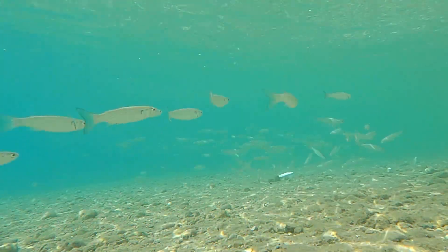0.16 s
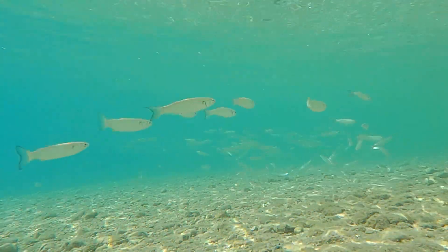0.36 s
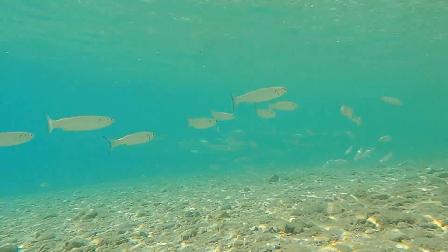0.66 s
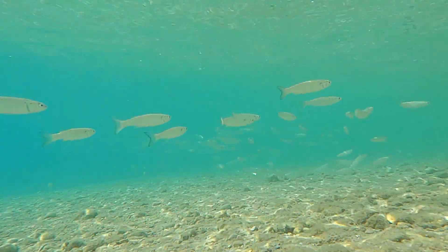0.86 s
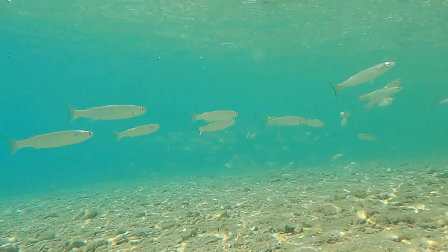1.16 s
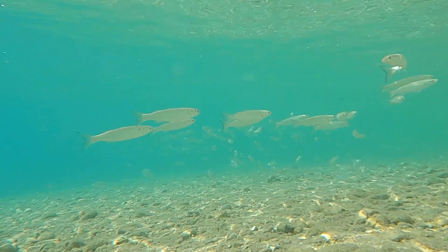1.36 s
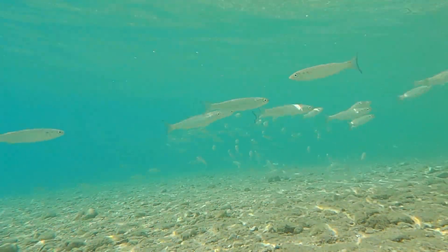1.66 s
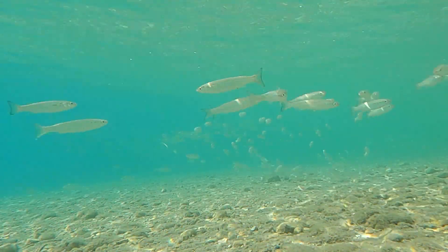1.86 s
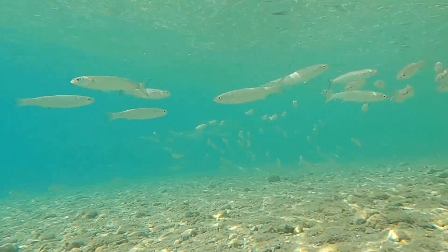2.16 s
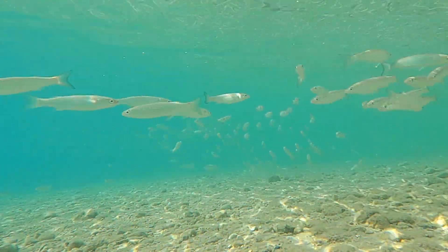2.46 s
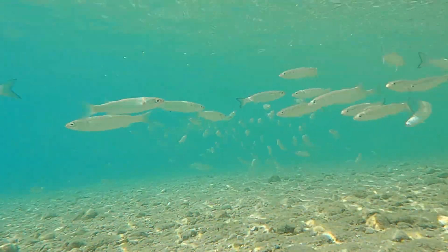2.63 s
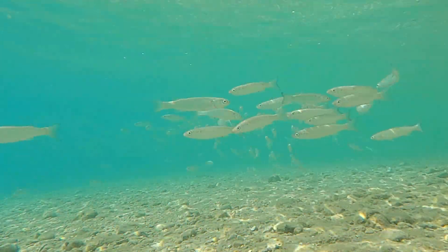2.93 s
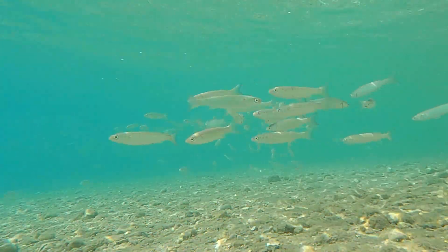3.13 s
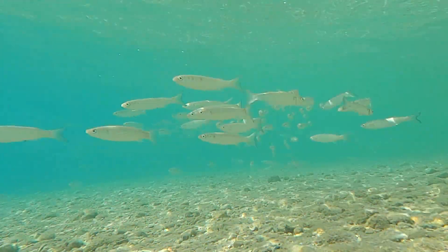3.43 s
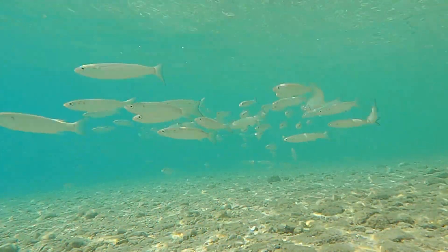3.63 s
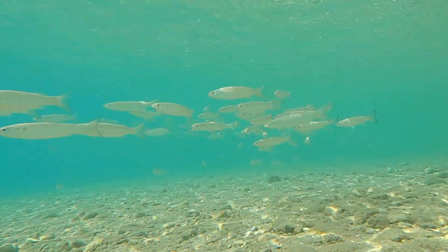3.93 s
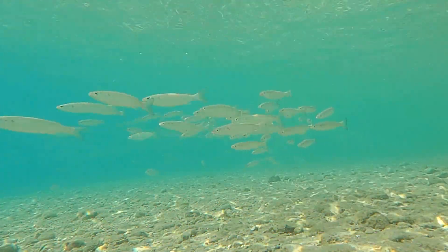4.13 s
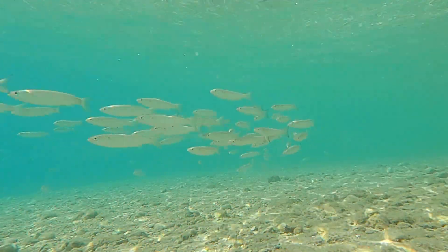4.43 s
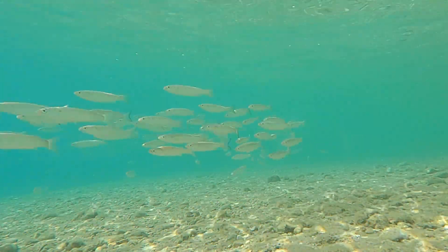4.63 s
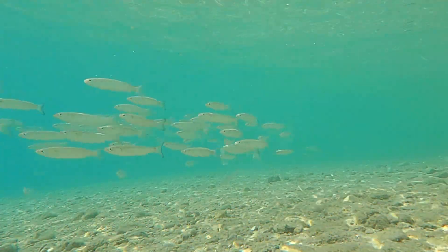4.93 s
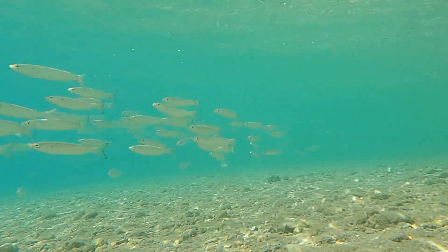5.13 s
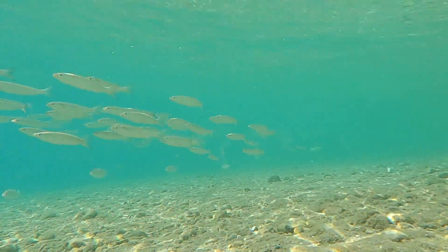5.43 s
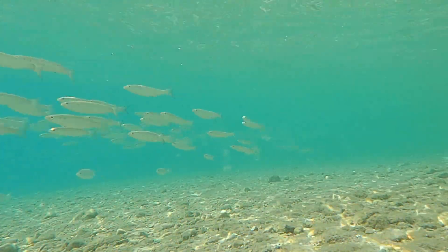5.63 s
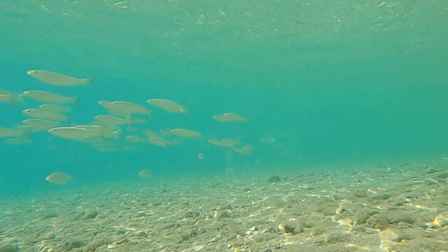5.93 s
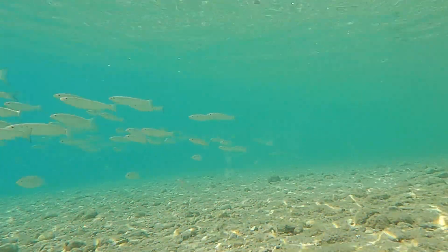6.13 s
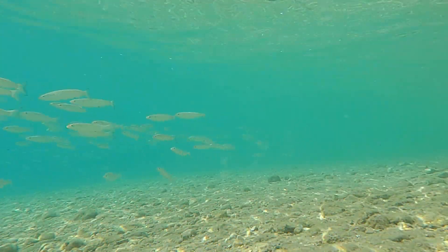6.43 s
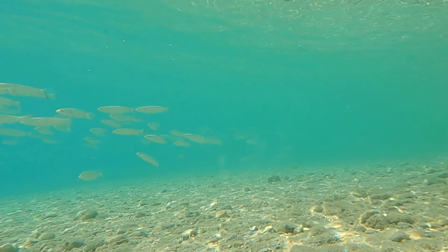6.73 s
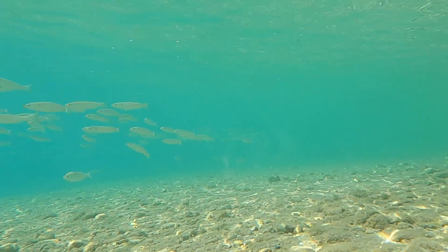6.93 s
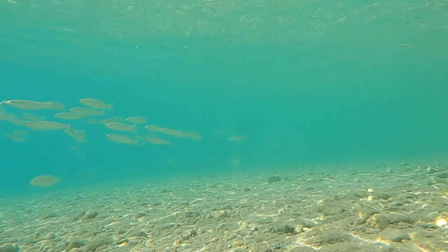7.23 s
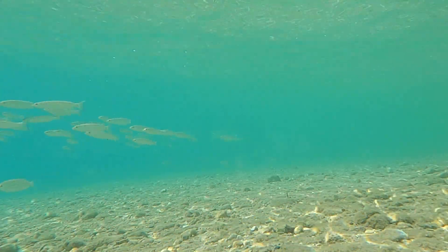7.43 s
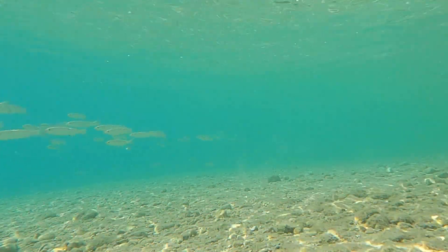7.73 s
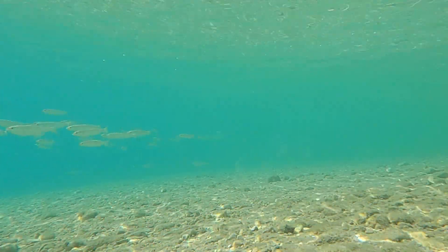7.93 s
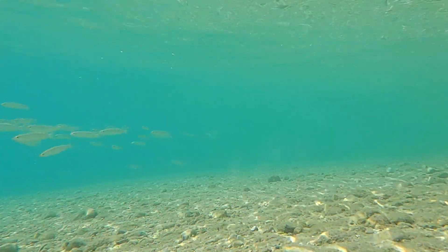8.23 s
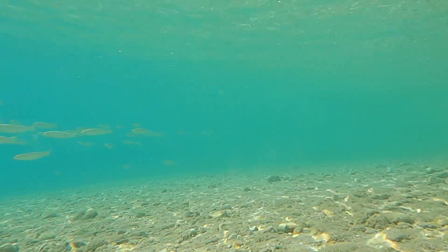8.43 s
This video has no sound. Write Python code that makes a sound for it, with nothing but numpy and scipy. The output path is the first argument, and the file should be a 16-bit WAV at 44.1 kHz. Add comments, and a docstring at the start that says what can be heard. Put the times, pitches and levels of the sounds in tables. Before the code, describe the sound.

A continuous underwater crackle: countless far shrimp blur into thin hiss, weaker snaps patter over it, and close ones pop as tiny bright spikes with very short pebble echoes. Water gently sways the microphones' sealed case, giving deep rumbles, rubbing washes and dull, quickly damped bumps, busiest around the middle and again near the end. Faint rushing swells come and go. The sound is close, boxy and slightly stereo.

```python
"""Under water over a shallow pebble bed: a camera rests in a sealed housing with two microphones inside.
Snapping shrimp click all around: near ones as sharp spikes with pebble echoes, further ones as random crackle,
the far colony as grainy noise, all coloured by the housing. Water noise sways the case and washes against it
in surges, soft knocks boom and rub on it, and a distant rush and a high whisper swell, some swells brief."""
import sys
import numpy as np
from scipy.fft import rfft, irfft, next_fast_len
from scipy.io import wavfile
from scipy.ndimage import map_coordinates

SR = 44100
rng = np.random.default_rng(int(sys.argv[2]) if len(sys.argv) > 2 else 0)


def file_out(sig):
    """Save sig as 16-bit WAV at sys.argv[1]."""
    # one column per channel
    cols = np.atleast_2d(sig).T
    # limit, then scale
    lim = np.clip(cols, -1, 1)
    pcm = np.round(lim * 32767).astype(np.int16)
    wavfile.write(sys.argv[1], SR, pcm)


N = 378378


def amp(db):
    """Decibels to amplitude gain."""
    return 10 ** (np.asarray(db) / 20)


def unit(x):
    """Scale x to rms 1."""
    return x / np.sqrt(np.mean(x ** 2) + 1e-30)


def along(points, hz):
    """Read each column of (frequency [Hz], ...) points on a log frequency axis."""
    point_hz, *columns = np.transpose(points)
    return np.squeeze([np.interp(np.log(hz + 1), np.log(point_hz), column) for column in columns])


def curves(rows):
    """Read each column of (time [s], ...) rows at every sample."""
    times, *columns = np.transpose(rows)
    return np.squeeze([np.interp(np.arange(N) / SR, times, column) for column in columns])


def wobble(rate):
    """A smooth random curve with rate knots a second."""
    knots = rng.standard_normal(int(N * rate / SR) + 4)
    return map_coordinates(knots, [np.arange(N) * rate / SR])


def coloured(x, level_db):
    """Pass x through the causal minimum-phase filter whose gain is level_db(Hz)."""
    n = x.shape[-1]
    m = 2 * next_fast_len(n // 2 + 2048)
    gain = amp(level_db(np.fft.rfftfreq(m, 1 / SR)))
    cepstrum = irfft(np.log(gain + 1e-6), m)
    # folding the cepstrum forward in time makes the filter causal
    cepstrum[1:m // 2] *= 2
    cepstrum[m // 2 + 1:] = 0
    return irfft(rfft(x, m) * np.exp(rfft(cepstrum)), m)[..., :n]


def noise(spectrum):
    """Two unrelated noises, rms 1 together, with the given relative spectrum."""
    white = rng.standard_normal((2, N))
    return unit(coloured(white, lambda hz: along(spectrum, hz)))


def add(track, s, sound):
    """Mix a sound into the track at s seconds."""
    start = max(round(s * SR), 0)
    part = track[:, start:start + sound.shape[1]]
    part += sound[:, :part.shape[1]]


def lift(rings, hz):
    """Gain in dB of a set of resonant peaks and notches."""
    return sum(db / (1 + (2 * (hz - centre) / width) ** 2) for centre, width, db in rings)


def swelling(events, calm_db, rise_share, edge_db, roundness):
    """Swells (crest s, length s, dB) add in power to a calm level; each is edge_db down at its ends."""
    t = np.arange(0, N / SR + .002, .002)
    rise_share = np.clip(rise_share, .1, .9)
    power = amp(calm_db) ** 2
    for s, length, db in events:
        before, after = (s - t) / rise_share, (t - s) / (1 - rise_share)
        away = np.maximum(before, after) / length
        power = power + amp(db - edge_db * np.abs(away) ** roundness) ** 2
    return curves(np.transpose([t, np.sqrt(power)]))


# what the housing lets through: (frequency [Hz], relative gain [dB])
HOUSING_COLOUR = [(300, -27.5), (520, -18.5), (690, -8), (900, -19.5), (1140, -19.5), (1420, -2),
                  (1820, 3.5), (2100, -11), (3300, -8), (4400, -2.5), (5600, -10.5), (7350, -11.5),
                  (8100, -24), (10500, -31), (12200, -37.5), (13800, -61)]
# narrow peaks and notches of the housing: (frequency [Hz], width [Hz], lift [dB])
HOUSING_RINGS = [(2255, 90, 6), (2613, 65, 7.5), (4020, 180, 8.5), (5850, 250, -3), (6210, 220, 4),
                 (6550, 200, -4), (6870, 200, 3)]


def housing(hz):
    """Gain in dB of the case: its broad colour plus its narrow rings."""
    return along(HOUSING_COLOUR, hz) + lift(HOUSING_RINGS, hz)


# the far colony's hiss ahead of the microphones: (time [s], level [dB])
COLONY_LEVEL = [(0, -56), (1.3, -57.5), (2.1, -58), (3.1, -57.5), (3.9, -56.5), (4.5, -58), (6.3, -57),
                (7.5, -59), (8.58, -56)]


def far_colony(grain_db=-1.0, low_db=-4):
    """Countless distant snaps merge into a grainy hiss: noise whose level flutters quickly."""
    grains = rng.standard_normal((2, N)) * amp(grain_db * wobble(600))
    lean = [(900, 1), (1500, low_db), (1900, low_db), (2400, 0.13)]
    hiss = unit(coloured(grains, lambda hz: housing(hz) + along(lean, hz)))
    return amp(curves(COLONY_LEVEL)) * hiss


# swells of distant hiss, some brief: (crest time [s], length [s], whisper level [dB], rush level [dB])
HISS_SWELLS = [(1.103, .6, -100, -63.5), (1.87, 0.27, -70, -60), (3.7, 1.8, -84, -72),
               (5.85, 1.3, -82, -66), (6.365, 0.18, -74, -66), (8.134, 0.22, -73, -62)]
# spectrum of the whisper: (frequency [Hz], relative level [dB])
WHISPER_SPECTRUM = [(7000, -63), (10000, -20), (11300, 1), (12000, 14), (12700, -10), (13600, -15)]


def whisper(calm_db=-104):
    """A faint narrow hiss near 12 kHz rises with most of the swells, some of them brief."""
    swells = [(s, length, db) for s, length, db, _ in HISS_SWELLS]
    level = swelling(swells, calm_db, rise_share=0.42, edge_db=7, roundness=0.94)
    return level * noise(WHISPER_SPECTRUM)


def rush(calm_db=-71, flutter_db=2.5, lag_s=0.17):
    """Distant water noise fills the housing's broad low resonance, lag_s behind the crest of each swell."""
    band = [(700, -34), (1100, -9), (1400, -2), (1610, 8),
            (1850, -2.0), (2100, -6.5), (2700, -9.5), (4000, -26.5)]
    swells = [(s + lag_s, length, db) for s, length, _, db in HISS_SWELLS]
    level = swelling(swells, calm_db, rise_share=0.57, edge_db=2.5, roundness=3.1)
    return level * amp(flutter_db * wobble(8.1)) * noise(band)


def arrivals(direct=5, hold=0.002, t60=0.028, drop_db=-6, tail_db=-31, tail_t60=0.3, echo_db=-23):
    """One snap's paths: the direct spike, a tight cluster off the pebbles, a quick decay, a weak late echo."""
    t = np.arange(SR // 12) / SR
    cluster = np.where(t < hold, 1, amp(drop_db - 60 * (t - hold) / t60))
    late = t - rng.uniform(.014, 0.041)
    echo = (late > 0) * amp(echo_db - 60 * np.abs(late) / t60)
    tail = amp(tail_db - 60 * t / tail_t60)
    paths = rng.standard_normal((2, len(t))) * (cluster + echo + tail)
    paths[0, 0] = direct  # the spike is shared by both microphones
    return paths


def crackle(rate=15, level_db=-61.0, spread_db=5.5, low_db=-8, top_db=3):
    """Weaker snaps from further off, a set strongest near 4 kHz and a set with more top near 7 kHz."""
    out = np.zeros((2, N))
    cap_db = 11
    middling = [(1700, -7), (4000, 7.5), (7000, -5.0)]
    sharp = [(1700, low_db), (3000, low_db / 2), (7000, top_db)]
    for lean in (middling, sharp):
        track = np.zeros((2, N))
        for when, chance in rng.random((int(rate * N / SR), 2)):
            size_db = min(-spread_db * np.log(1 - chance), cap_db)  # the fainter, the more common
            snap = arrivals(direct=6, hold=0.0014, t60=0.03)
            add(track, when * N / SR, amp(size_db) * snap)
        out += unit(coloured(track, lambda hz: housing(hz) + along(lean, hz)))
    return amp(level_db) * out


# surges against the case: (crest time [s], length [s], sway level [dB], wash level [dB])
WATER_SURGES = [(0.073, 0.29, -52, -67), (0.87, 0.058, -60, -76.5), (1.276, 0.42, -64, -57.5),
                (1.59, 0.12, -42, -78), (1.744, 0.23, -55, -60.5), (2.107, 0.12, -44.5, -54.5),
                (2.285, 0.1, -61, -56.5), (2.758, 0.14, -54.5, -56), (3.35, 0.49, -65, -59),
                (4.015, 0.22, -69, -53.5), (4.142, 0.13, -50.5, -76), (4.5, 0.16, -48, -66),
                (4.758, 0.24, -61, -47), (4.9, 0.16, -43.5, -52), (5.14, 0.045, -70, -59),
                (5.282, 0.31, -49.5, -50.5), (5.467, 0.27, -54.5, -58), (6.088, .16, -53, -70),
                (6.26, 0.25, -60, -64), (6.79, 0.4, -59, -58), (7.27, 0.13, -63, -62),
                (7.406, .12, -67, -50), (7.682, 0.16, -52.5, -57.5), (8.057, 0.29, -53.5, -78),
                (8.348, 0.28, -56, -50), (8.553, .14, -60, -75)]
# spectrum of the case's sway: (frequency [Hz], relative level [dB per Hz])
SWAY_SPECTRUM = [(10, -27.5), (28, -5), (45, -6), (62, -9.5), (90, -13), (120, -24.5), (200, -49),
                 (400, -120)]
# spectrum of the wash along the case: (frequency [Hz], relative level [dB per Hz])
WASH_SPECTRUM = [(50, -18), (105, -24), (140, -0.5), (215, -2.5), (310, -9.5), (450, -20), (720, -17),
                 (900, -38), (1400, -28.5), (3000, -65)]


def water(lumps_db=2.3, calm_sway_db=-77.5, calm_wash_db=-68):
    """Each surge rocks the case and rubs along it in small lumps."""
    sways = [(s, length, db) for s, length, db, _ in WATER_SURGES]
    washes = [(s, length, db) for s, length, _, db in WATER_SURGES]
    sway = swelling(sways, calm_sway_db, rise_share=0.4, edge_db=13.5, roundness=1.29)
    wash = swelling(washes, calm_wash_db, rise_share=0.44, edge_db=8.5, roundness=1.04)
    lumps = amp(lumps_db * wobble(45))
    return sway * noise(SWAY_SPECTRUM) + wash * lumps * noise(WASH_SPECTRUM)


# soft knocks, ahead of the case's body:
# (time [s], boom level [dB], boom pitch [Hz], brightness: raises the thud against the boom [dB])
CASE_KNOCKS = [(0.811, -43.5, 166, -7.5), (1.254, -52, 203, 3), (1.574, -30.5, 136, -22),
               (2.094, -39.5, 191, -7), (4.094, -36.5, 133, -11), (4.692, -29.5, 223, -7.5),
               (4.763, -38, 221, -6.5), (4.866, -32, 130, -13), (5.389, -35.5, 212, -28),
               (6.121, -49, 140, -5.5), (6.704, -39, 197, -16), (7.648, -32.5, 147, -6),
               (7.918, -37.5, 142, -20), (8.281, -31.5, 241, -9.5)]


def knocks(t60=0.074, attack=0.0014, rub_db=-21, rub_t60=0.042, thud_db=7,
           rock_hz=42, rock_db=-15, rock_t60=0.057):
    """A soft contact: one dull push with a brief rub, a damped boom and a slow rocking of the case."""
    track = np.zeros((2, N))
    t = np.arange(SR // 3) / SR
    dull = [(80, -16.5), (250, 10.0), (450, 1.0), (750, -8.5), (1000, -19), (1500, -9), (3000, -48)]
    for s, db, hz, bright_db in CASE_KNOCKS:
        boom = np.sin(2 * np.pi * hz * t) * amp(-60 * t / t60)
        rock = np.sin(2 * np.pi * rock_hz * t) * amp(rock_db - 60 * t / rock_t60)
        push = rng.standard_normal((2, len(t))) * amp(rub_db - 60 * t / rub_t60)
        push[0, 0] = 1
        thud = coloured(push, lambda f: along(dull, f))
        thud *= amp(bright_db + thud_db) / np.abs(thud[0]).max()
        thud[0] += (boom + rock) * (1 - np.exp(-t / attack))
        add(track, s, amp(db) * thud)
    return track


# near shrimp, ahead of the microphones: (time [s], level around 4 kHz [dB],
# low ring near 1.6 kHz and middle ring near 2.7 kHz, both relative to that level [dB])
NEAR_SNAPS = [(0.075, -41, -21, -14), (0.0956, -41.5, -14, -7.5), (0.142, -37.5, -7, -6),
              (0.2133, -42, -14, -10), (0.5496, -37.5, -16, -10.5), (0.602, -43, -12, -14),
              (0.6477, -41.5, -12, -9), (0.728, -41.5, 8, 6), (0.7596, -42, -17, -16),
              (0.8973, -39, -11.5, -13), (1.168, -41, -40, -21), (1.2129, -49, 4.5, 1),
              (1.226, -36.5, -19, -15), (1.242, -43.5, -11, -8), (1.7343, -29.5, -3.5, -2),
              (1.8153, -44.5, -9.5, -12), (1.8717, -45.5, -17, -18), (2.0839, -44.5, -3.5, -4.5),
              (2.1086, -43.5, -14, -8), (2.319, -45.5, -32, -17), (2.4648, -34.5, -5, -18),
              (2.681, -43.5, -17, -11), (2.7631, -29, -3.5, -3.5), (2.786, -40.5, 3.5, 2.5),
              (2.8482, -43.5, -15, -15), (3.3347, -37.5, -19, -14.5), (3.3737, -43.5, -11, -16),
              (3.6518, -40.5, -12, -8.5), (3.725, -37.5, -22, -12), (3.739, -35, -4, -2.5),
              (3.825, -43, -34, -27), (3.8866, -38.5, -17, -11.5), (3.946, -43.5, -27, -16),
              (4.0608, -35, 3.5, 2), (4.6308, -36, -8.5, -8), (4.7534, -43.5, -24, -20),
              (4.885, -35, -25, -11), (5.0166, -40, 8, 3), (5.1384, -39.5, -10, -9),
              (5.482, -44.5, 0, -0.5), (5.5346, -35, 5.5, -7), (5.6324, -35, -9.5, -7.5),
              (5.7568, -31, -13, -8.5), (5.8458, -43.5, 0.5, -1), (5.879, -41, -25, -10.5),
              (6.0422, -42, -12, -11.5), (6.205, -39, -15, -18), (6.3489, -33, -2.5, -4.5),
              (6.456, -45.5, -10, -12), (6.502, -38.5, -7.5, -5), (6.563, -31, 4.5, -4),
              (6.8254, -41, -17, -8.5), (6.991, -37, -8, -5), (7.0564, -35.5, -28, -8.5),
              (7.2363, -21.5, -24, -11.5), (7.483, -42, -30, -10), (7.6607, -38.5, -11.5, -9.5),
              (7.8774, -39.5, -1, -3), (8.2906, -40, -11, -18), (8.3158, -39.5, -10, -10),
              (8.4051, -40.5, -7.5, -4), (8.4876, -43, -6, -5), (8.4931, -30, 2.5, -11)]
TYPICAL_DB = -36
# treble rises with a snap's low ring (dB, dB per dB); quiet snaps are brighter (dB per dB)
TREBLE_DB, TREBLE_PER_LOW, TREBLE_LOSS_PER_DB = -11.5, 0.28, 0.55
# loud, close snaps keep a crisp edge above 8 kHz, set against their treble (dB, dB per dB)
AIR_DB, AIR_PER_DB = -2, 0.67


def near_shrimp(cut_db=-12):
    """Each claw's collapsing bubble rings the housing with its own balance of low and high."""
    track = np.zeros((2, N))
    bands = [(1000, 2150), (2150, 3400), (3400, 5400), (5400, 12000)]
    span = .01 * SR  # band levels count a snap's energy as spread over 10 ms
    for s, db, low, mid in NEAR_SNAPS:
        snap = coloured(arrivals(), housing)
        louder_db = db - TYPICAL_DB
        treble = TREBLE_DB + TREBLE_PER_LOW * low - TREBLE_LOSS_PER_DB * louder_db
        air = AIR_DB + AIR_PER_DB * louder_db
        hz = np.fft.rfftfreq(snap.shape[1], 1 / SR)
        power = np.abs(rfft(snap[0])) ** 2 * 2 / snap.shape[1]
        own = np.array([10 * np.log10(power[(hz > lo) & (hz < hi)].sum() / span) for lo, hi in bands])
        # the gain each band needs to reach its wanted level
        bass, middle, body, top = db + np.array([low, mid, 0, treble]) - own
        tilt = [(700, bass + cut_db), (1300, bass), (1950, bass), (2300, middle), (3100, middle),
                (3700, body), (5000, body), (5900, top), (7400, top), (10000, top + air)]
        add(track, s, coloured(snap, lambda f: along(tilt, f)))
    return track


# the two microphones in the housing: (frequency [Hz], side minus mid [dB], left minus right [dB])
MICROPHONES = [(30, -27, 0), (60, -22, 0.7), (204, -11.5, 0.3), (437, -5.5, -3.5), (670, -4.5, 2.5),
               (1170, 2, -1.5), (1620, -8, 2.5), (2900, -3, 3.5), (4250, -15.5, 0.2), (5500, -17.5, -3),
               (8700, -3.5, 3), (13000, -8, 1.5)]


def stereo(pair):
    """A shared (mid) and an unshared (side) signal reach the left and right microphones."""
    m = next_fast_len(N + 4096)
    side_db, pan_db = along(MICROPHONES, np.fft.rfftfreq(m, 1 / SR))
    mid, side = rfft(pair, m)
    side = side * amp(side_db)
    left = (mid + side) * amp(pan_db / 2)
    right = (mid - side) * amp(-pan_db / 2)
    return irfft([left, right], m)[:, :N]


# low peaks and notches of the whole case: (frequency [Hz], width [Hz], lift [dB])
CASE_BODY = [(35.5, 13, 8), (60, 10, 5), (76, 12, -5), (137, 26, 4), (184, 20, -4), (212, 28, 5),
             (256, 34, 4), (298, 30, -5), (450, 40, 5), (535, 60, -8)]


def scene():
    """Water and knocks shake the whole case; everything reaches the two microphones inside it."""
    shaking = coloured(water() + knocks(), lambda hz: lift(CASE_BODY, hz))
    distant = far_colony() + whisper() + rush()
    return stereo(distant + crackle() + shaking + near_shrimp())


TOP_HZ = 13600


def record(dry):
    """The camera keeps nothing above its band limit."""
    m = next_fast_len(N + 4096)
    kept = np.fft.rfftfreq(m, 1 / SR) < TOP_HZ
    return irfft(rfft(dry, m) * kept, m)[:, :N]


dry = scene()
out = record(dry)
file_out(out)
```